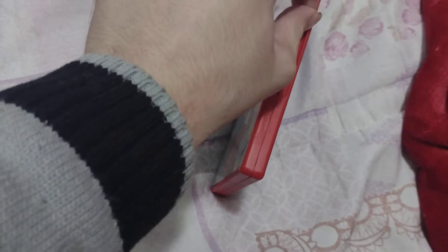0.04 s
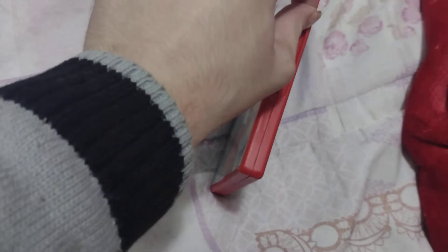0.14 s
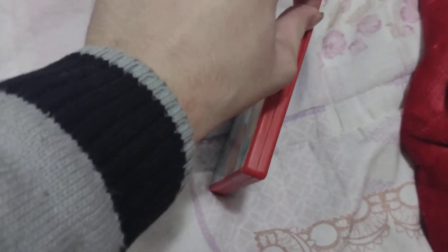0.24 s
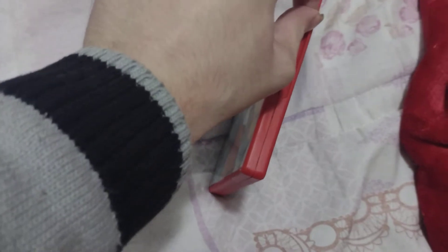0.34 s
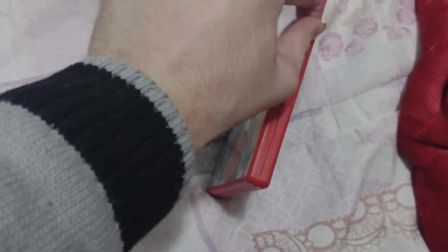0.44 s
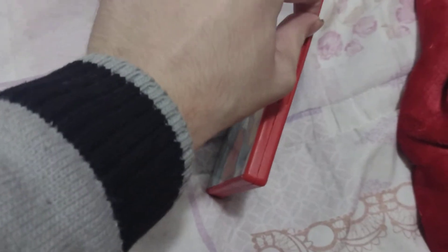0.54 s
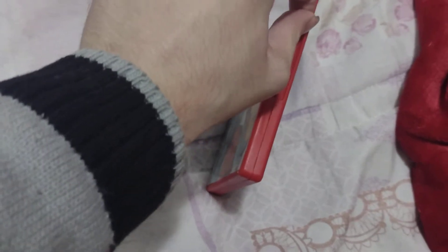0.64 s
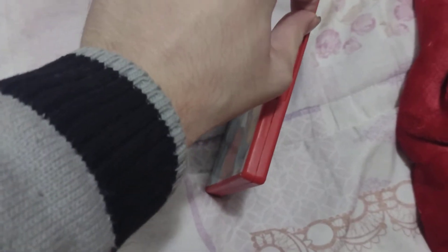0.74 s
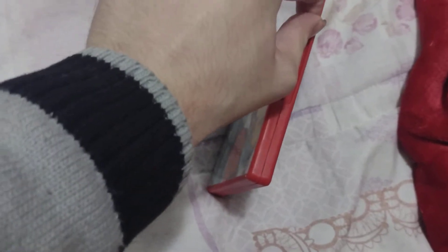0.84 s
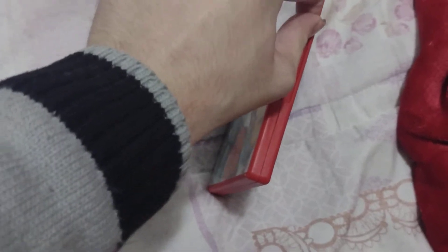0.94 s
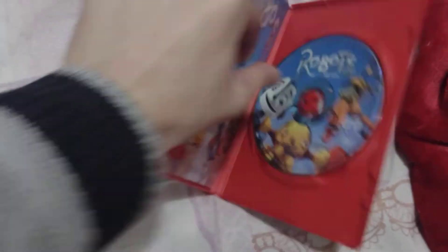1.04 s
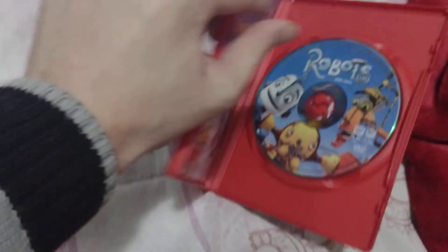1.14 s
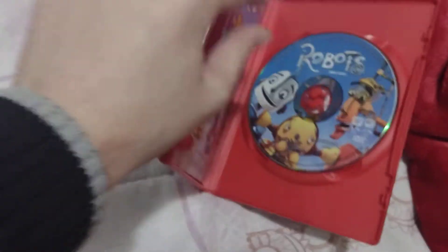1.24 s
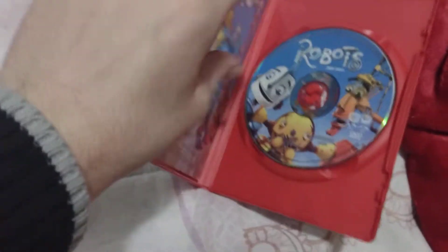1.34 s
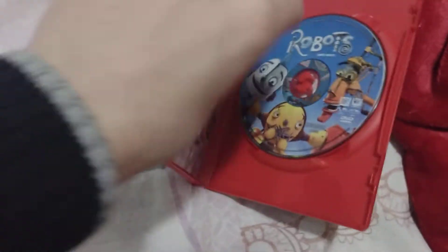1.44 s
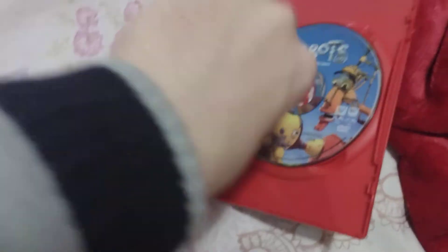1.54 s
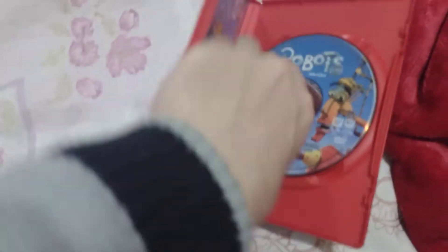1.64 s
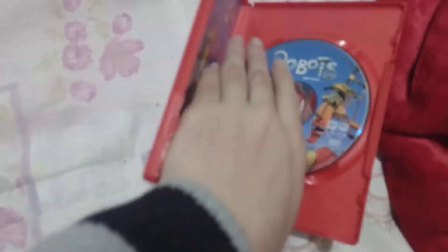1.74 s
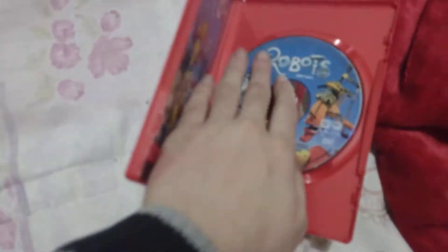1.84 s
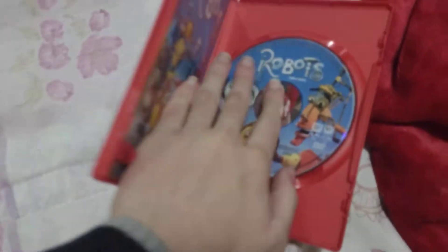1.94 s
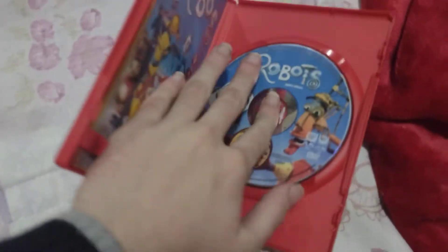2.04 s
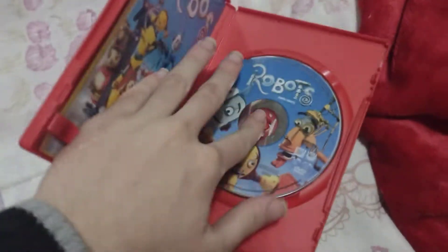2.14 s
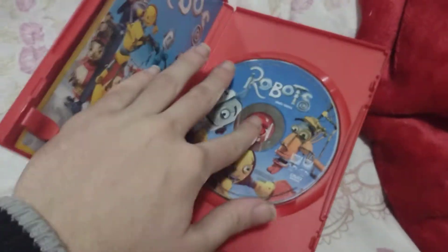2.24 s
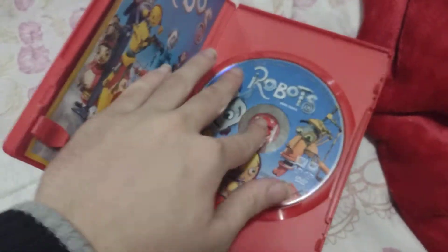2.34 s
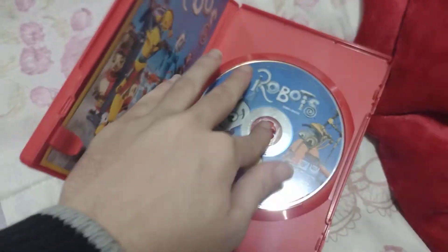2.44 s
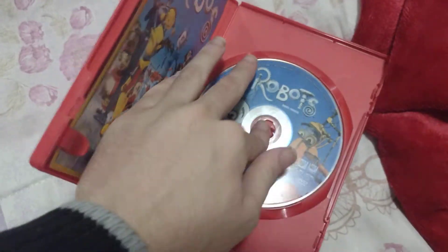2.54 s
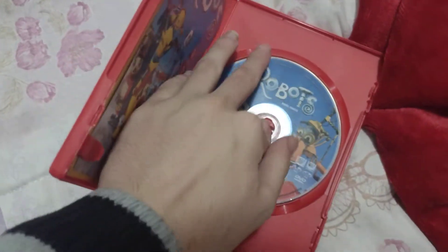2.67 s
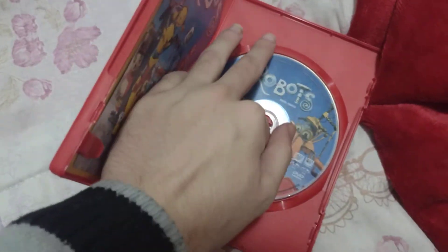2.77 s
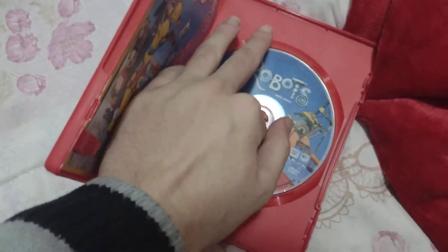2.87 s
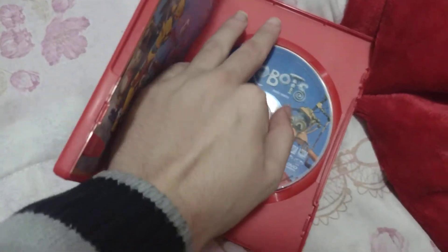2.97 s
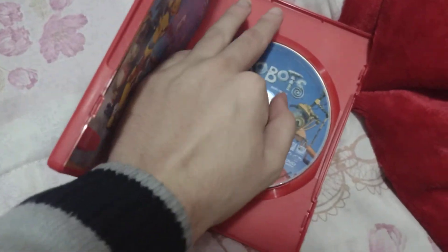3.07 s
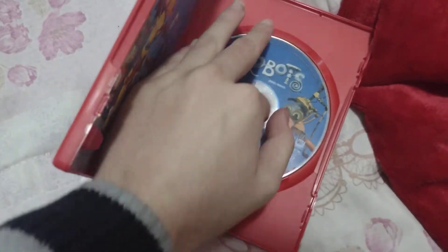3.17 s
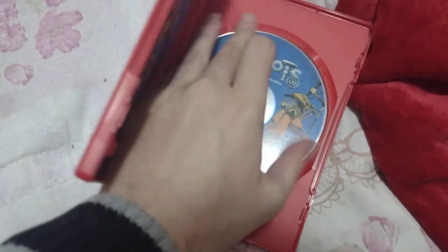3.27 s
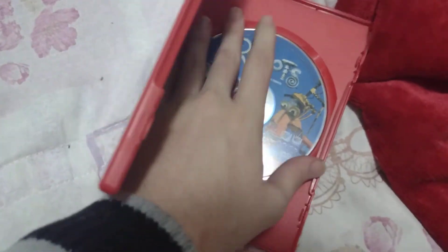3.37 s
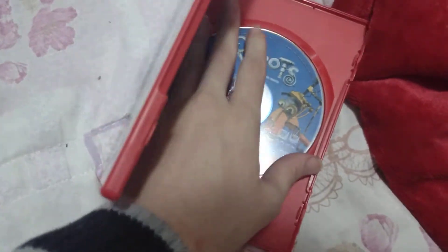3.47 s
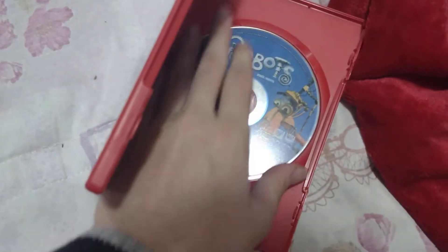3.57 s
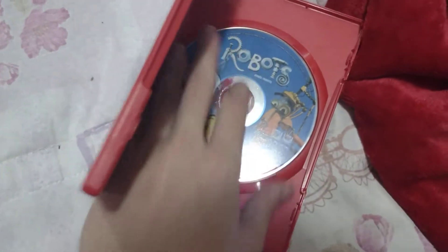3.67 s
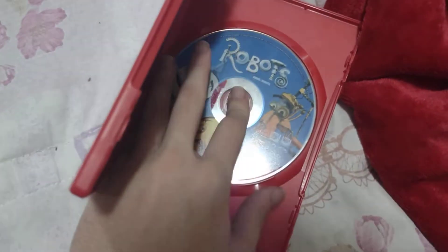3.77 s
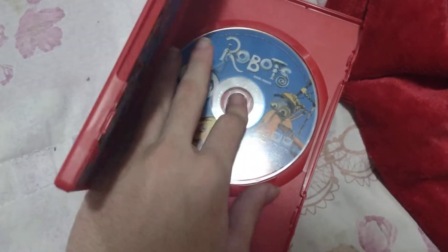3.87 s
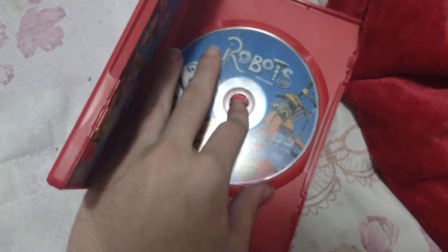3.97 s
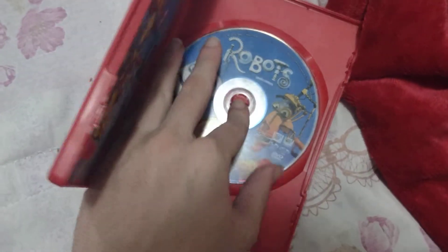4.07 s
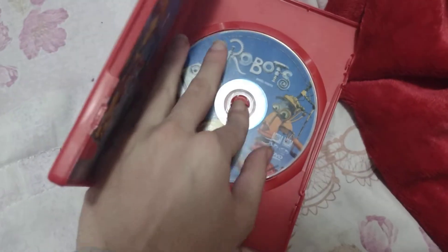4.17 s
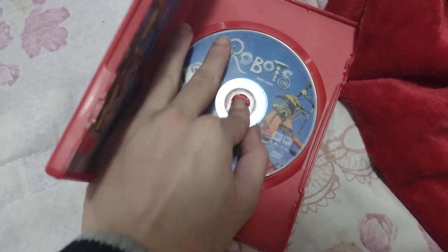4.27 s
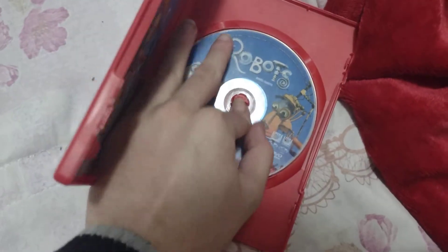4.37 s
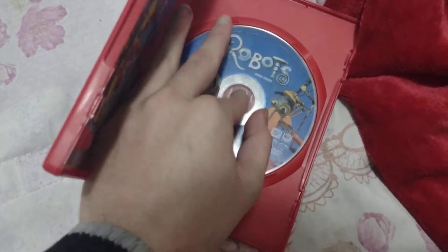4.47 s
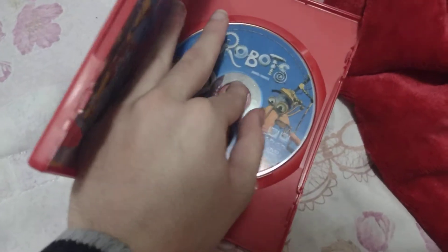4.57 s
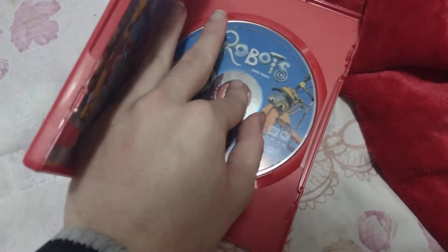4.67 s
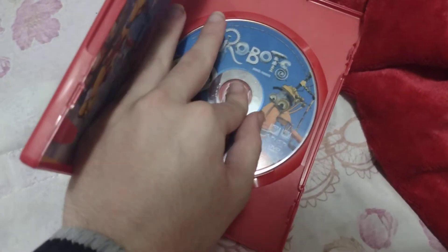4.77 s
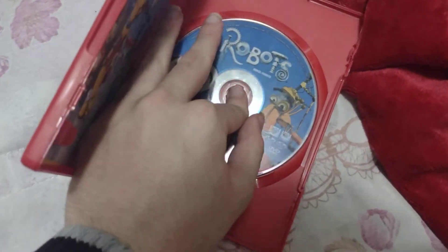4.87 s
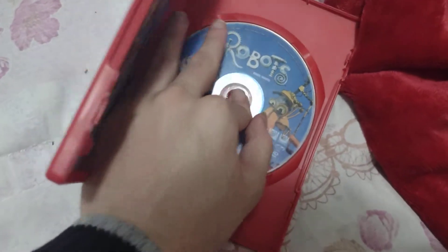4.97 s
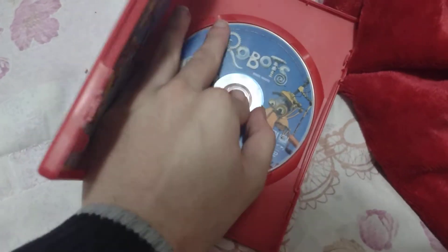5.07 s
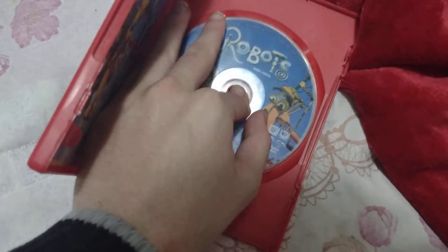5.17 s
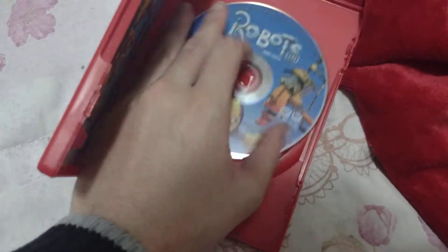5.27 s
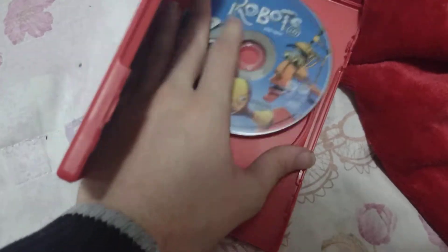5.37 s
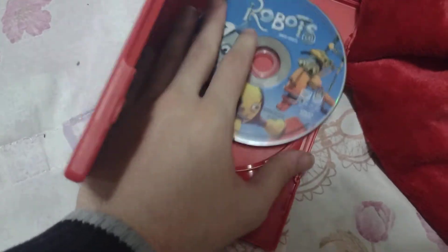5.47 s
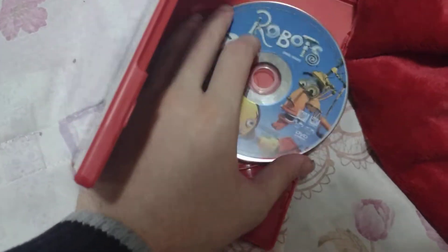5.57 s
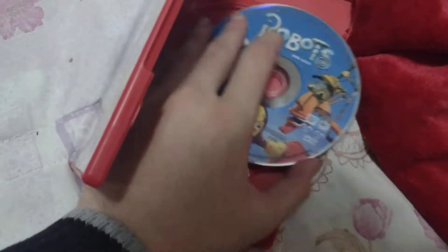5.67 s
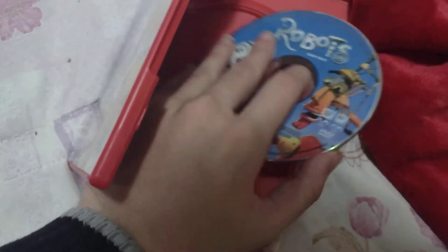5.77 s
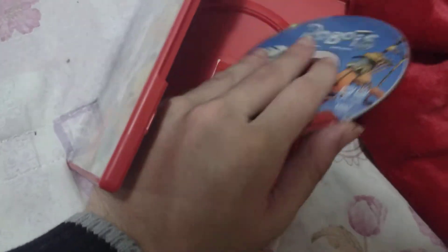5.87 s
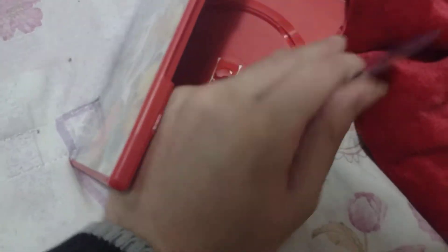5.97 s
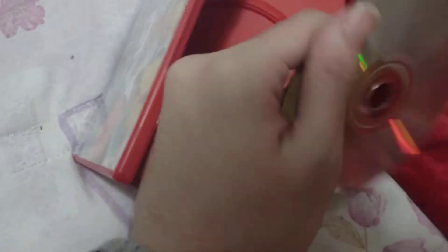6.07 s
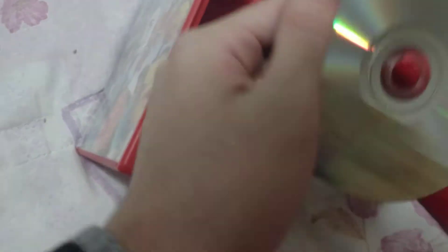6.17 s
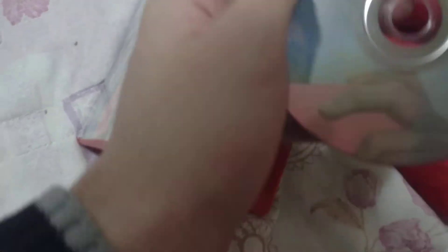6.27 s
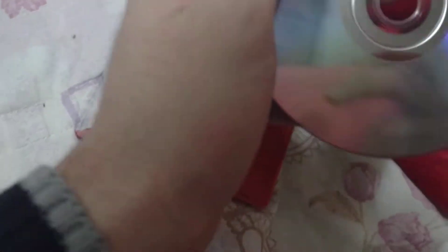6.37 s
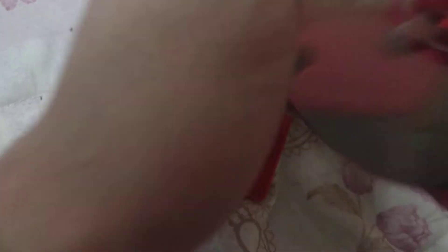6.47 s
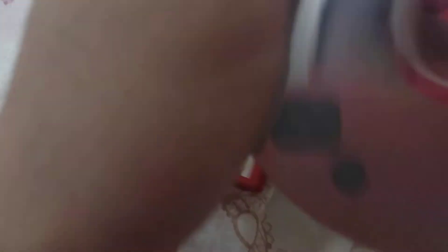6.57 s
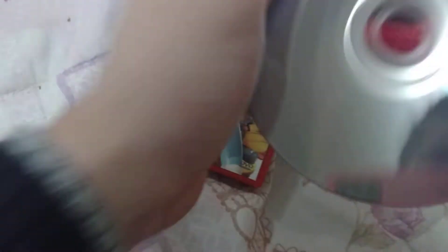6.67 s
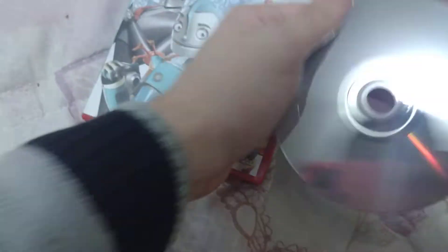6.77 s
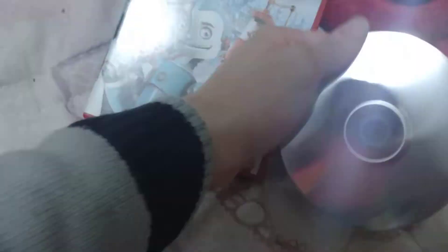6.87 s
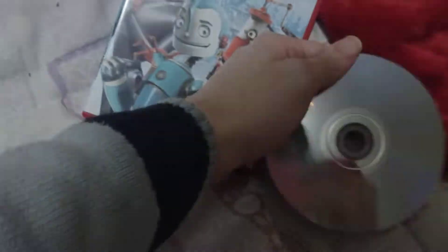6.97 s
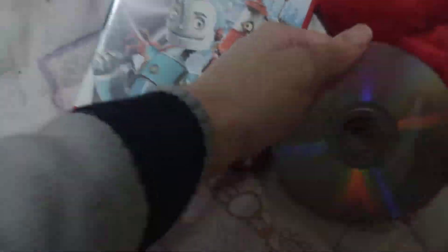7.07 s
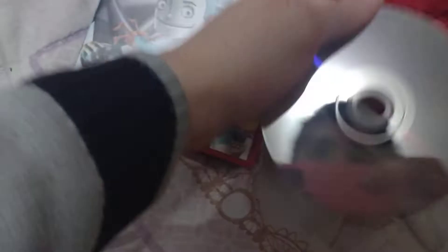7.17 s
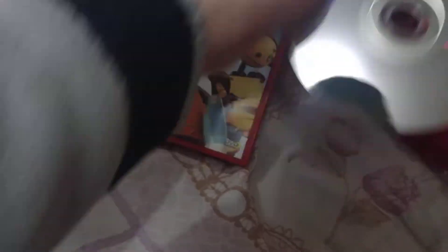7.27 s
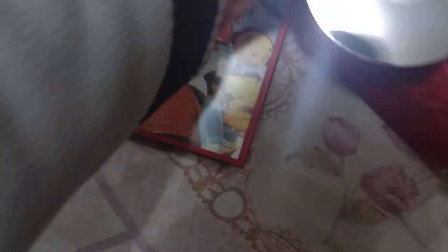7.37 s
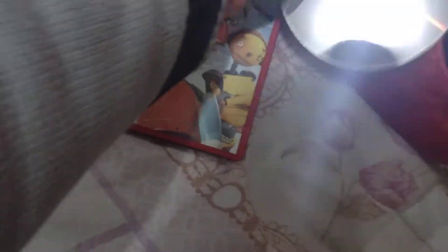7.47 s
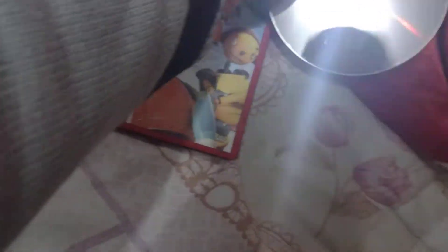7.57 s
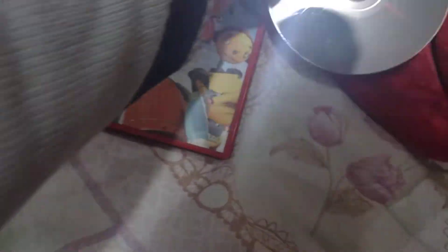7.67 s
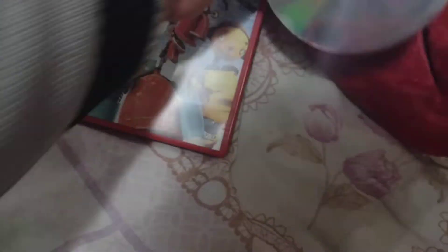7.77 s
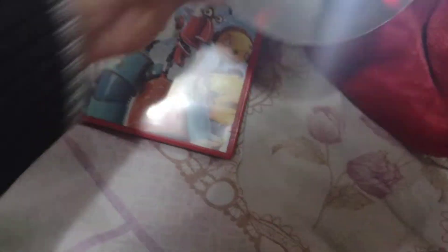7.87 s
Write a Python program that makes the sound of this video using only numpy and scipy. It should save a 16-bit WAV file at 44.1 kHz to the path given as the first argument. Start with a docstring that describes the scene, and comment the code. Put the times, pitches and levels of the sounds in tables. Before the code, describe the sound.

Sharp plastic snaps, hollow knocks and squeaky rubbing as hands open a disc case, prise the disc free and close it.

```python
"""A quick run of sharp snaps, after a second of faint hiss: a plastic disc case is prised open on a bed.
Its bending shell gives hollow knocks, and fingers rub, squeak and press the hub that holds the disc.
The disc pops out and rings as it slides over the rim, then the case is pushed shut with a few knocks.
It all happens close to the microphone, in a small room."""
import sys
import numpy as np
from scipy import signal
from scipy.fft import rfft, irfft
from scipy.io import wavfile
from scipy.ndimage import uniform_filter1d, minimum_filter1d

SR = 44100
rng = np.random.default_rng(int(sys.argv[2]) if len(sys.argv) > 2 else 0)


def dump_mix(stems):
    """Bounce the given channels to the path in sys.argv[1] as a 16-bit WAV at rate SR."""
    frames = np.atleast_2d(stems).T  # one column per channel
    limited = np.clip(frames, -1, 1)  # hard clip at full scale
    pcm = np.round(limited * 32767).astype(np.int16)
    wavfile.write(sys.argv[1], SR, pcm)


N = 349272
HIT = 2048  # samples in one short hit

# the notes at which the case rings with its disc inside: pitch_hz, width_hz, level_db
CASE_NOTES = [(2716, 68, -0.5), (3068, 31, -5), (3430, 140, -0.5), (3910.4, 140, -0.5), (5737, 120, 0),
              (6550, 210, -1), (8290, 380, -6)]
# tone shapes of a low thump, the hollow shell, a bright crack and a rubbing hiss: pitch_hz, level_db
THUMP_TONE = [(30, -26.5), (90, -16.5), (150, -3), (230, 4.5), (420, 7.5), (560, -5.5), (850, -30.5)]
SHELL_TONE = [(200, -30), (480, -16.5), (720, 0.5), (1050, 0), (1600, -3.5), (2200, -6.5), (3000, -12),
              (6000, -53)]
CRACK_TONE = [(900, -34), (2000, -4), (2900, 2), (4200, -6.5), (6400, -3), (8500, -12), (11000, -21)]
HISS_TONE = [(900, -39), (2000, 1), (3000, 3.5), (4200, 1.5), (6000, 2.5), (8500, 1), (11000, 0),
             (16000, -16.5)]
# hand and sleeve slide over the plastic; more grip makes the shell sound more:
# start_s, length_s, level_db, grip_db
SLIDES = [(1.056, 0.4645, -63, -7.5), (1.963, 0.427, -60, -5), (2.563, 0.458, -67.5, -4.5),
          (3.431, 0.519, -56.5, -3.5), (3.589, 0.272, -53.5, -9), (4.192, 0.597, -59, -2.5),
          (4.96, 0.32, -62, -6.5), (5.84, 0.239, -52.5, -11), (5.947, 0.3595, -64, -9),
          (6.603, 0.643, -63.5, -5.5)]


def snap(db, spot_hz, t60, body_db, spot_t60=0.04, spot_db=-3.5, tick_db=-4, ring_db=-6, thump_db=-16):
    """An edge slips off a catch: the struck spot rings with its own note, over the notes of the case."""
    t = np.arange(HIT) / SR
    hz, width, note_db = np.transpose(CASE_NOTES)
    gain = undb(note_db + 2 * rng.standard_normal(len(hz)))
    pitch = hz * (1 + 0.031 * rng.standard_normal(len(hz)))  # the grip bends the shell out of tune
    phase = rng.uniform(0, 2 * np.pi, (len(hz), 1))
    waves = np.sin(2 * np.pi * pitch[:, None] * t + phase) * np.exp(-.35 * width[:, None] * t)
    envelope = fade(t60) - fade(t60 / 10)  # the ring builds as the wave crosses the shell
    ring = at_level(gain @ waves * envelope, ring_db)
    spot = at_level(np.sin(2 * np.pi * spot_hz * t) * envelope * fade(spot_t60), spot_db)
    tick = at_level(colour(impact(t60, rattle=4.2), HISS_TONE), tick_db)
    body = at_level(colour(impact(t60, rattle=1.0), SHELL_TONE), body_db)
    thump = at_level(colour(impact(t60, rattle=1.5), THUMP_TONE), body_db + thump_db)
    return undb(db) * (ring + spot + tick + body + thump)


def snaps_and_ticks(stray_db=7):
    """Creaks, hard snaps, light taps and stray ticks from the sliding hand all ring the same case."""
    # the strained hub and hinge creak: start_s, length_s, level_db, body_db (shell, added to level_db)
    creaks = [(3.268, 0.0287, -42, -3), (4.014, 0.0443, -53, 4.5), (4.275, 0.0455, -37, 4.5),
              (4.578, 0.0407, -35.5, -2.5), (4.647, 0.036, -46, -0.5), (5.382, 0.0551, -32.5, -11)]
    # latch, hub and disc edge snap: start_s, level_db, pitch_hz, body_db (shell, added to level_db)
    hard_snaps = [(1.0705, -33, 3580, -1.5), (1.078, -22.5, 3170, -5), (1.084, -23.5, 2820, -5),
                  (1.099, -24.5, 6036, -10), (1.1155, -15.5, 2952, -10.5), (1.127, -24, 5713, -13),
                  (1.143, -23, 2738, -10), (1.156, -24.5, 5826, -17.5), (1.178, -32, 5967, -12.5),
                  (1.887, -35, 6230, -2.5), (2.764, -36, 7954, -15.5), (3.258, -28.5, 2710, -3.5),
                  (3.2611, -24.5, 2907, -6.5), (3.74, -35.5, 2950, -11.5), (4.5522, -22.5, 6736, -8.5),
                  (4.641, -30.5, 2717, -9), (5.019, -41, 3596, -2), (5.288, -31, 2896, 0),
                  (5.394, -26.5, 4164, -5.5), (5.401, -25.5, 6120, -10.5), (5.4432, -17, 6080, -9),
                  (5.453, -29.5, 2813, -10.5), (5.835, -41, 6105, -10.5)]
    # fingernails and disc edge tap the tray: start_s, level_db
    taps = [(1.315, -48), (1.369, -41), (1.416, -47.5), (2.029, -48), (2.115, -56), (2.179, -46.5),
            (2.284, -56), (2.36, -54.5), (2.415, -51), (2.439, -55), (2.567, -50), (3.037, -49),
            (3.321, -44), (3.335, -45.5), (3.504, -43), (3.625, -57), (4.111, -50.5), (4.152, -49.5),
            (4.196, -55), (4.37, -44.5), (4.624, -44.5), (4.725, -50.5), (4.757, -52.5), (4.785, -56.5),
            (4.985, -54), (5.306, -39.5), (5.463, -41), (5.656, -54.5), (6.086, -44)]
    out = sum(crackle(*creak, per_s=220) for creak in creaks)
    for start, db, spot_hz, body_db in hard_snaps:
        t60 = 0.028 * 2 ** ((-27 - db) / 13.5)  # a strong snap breaks free at once, a weak one rasps on
        add(out, start, snap(db, spot_hz, t60, body_db))
    for start, db in taps:
        add(out, start, snap(db, spot_hz=2778, t60=0.035, body_db=-2.5))
    for start, length, db, grip_db in SLIDES:
        out += crackle(start, length, db + stray_db, grip_db, per_s=30)
    return out


def crackle(start, length, db, body_db, per_s, spread_db=12, t60=0.011):
    """A run of tiny uneven snaps at random spots, strongest in the middle of the movement."""
    out, count = np.zeros(N), int(per_s * length)
    for k, (delay, spot, weakness) in enumerate(rng.random((count, 3))):
        progress = (k + delay) / count
        spot_hz = CASE_NOTES[int(spot ** 2 * len(CASE_NOTES))][0]
        tick = snap(db - spread_db * weakness, spot_hz, t60, body_db)
        add(out, start + progress * length, np.sin(np.pi * progress) * tick)
    return out


def shell_knocks(overtone=1.4, overtone_db=-6, crack_lead_s=0.00039, shut_s=6.5):
    """The shell buckles: a short crack, a hollow note with a higher one above it, and a low thump."""
    # pops of the shell: start_s, level_db, pitch_hz, fade_s, hardness_db (treble, added to level_db)
    pops = [(1.088, -23, 1150, 0.014, -5), (2.8105, -20.5, 1070, 0.0222, -16.5),
            (3.0717, -24, 798.3, 0.0148, -1.5), (4.2414, -34, 817, 0.0576, -36.5),
            (4.44, -20.5, 1226, 0.0178, -13), (4.5517, -24.5, 1430, 0.029, -8),
            (5.1063, -21, 1105, 0.0126, -7), (5.1526, -26, 870, 0.0129, -2), (5.951, -47, 680, 0.0476, -19),
            (6.7488, -34, 1088, 0.0213, -7), (6.9346, -33.5, 1086, 0.035, -5.5),
            (6.9913, -26.5, 821, 0.0135, -16.5), (7.0253, -19.5, 630, 0.0091, -25.5),
            (7.191, -44.5, 880.2, 0.0137, -2), (7.5512, -25, 954, 0.0159, -20),
            (7.794, -47.5, 862, 0.019, -11)]
    # tone shape of the highest treble: pitch_hz, level_db
    treble_tone = [(5000, -20), (8500, 3), (11000, 1), (13500, 6), (16000, -15.5)]
    out = np.zeros(N)
    for start, db, hz, t60, hardness_db in pops:
        thump_db = -12.5 if start >= shut_s else -21  # once shut, the case thumps the bed as one box
        crack_db = -1 + 0.15 * hardness_db  # a harder knock cracks more
        push = colour(impact(t60, rattle=0.66), SHELL_TONE)
        hollow = resonate(push, hz, 0.41 * hz) + undb(overtone_db) * resonate(push, overtone * hz, hz / 2)
        thump = colour(impact(2 * t60, rattle=1.0), THUMP_TONE)
        crack = colour(impact(0.98 * t60, rattle=20.0), CRACK_TONE)
        treble = colour(impact(.7 * t60, rattle=6.9), treble_tone)
        bright = at_level(crack, db + crack_db) + at_level(treble, db + hardness_db)
        add(out, start, at_level(hollow, db) + at_level(thump, db + thump_db))
        add(out, start - crack_lead_s, bright)
    return out


def hand(fidget_start_s=1.1):
    """Long slides mostly hiss, short scuffs scratch and squeak, and in between the hand fidgets."""
    # a finger or edge presses harder and harder, then lets go: peak_s, level_db, build_s, grip_db
    presses = [(1.098, -30, 0.0385, -2.5), (1.768, -49.5, 0.1295, -6.5), (1.834, -44.5, 0.014, -7.5),
               (2.577, -53.5, 0.0468, 5), (3.273, -36, 0.051, -14), (4.009, -47, 0.0189, 0.5),
               (5.406, -45.5, 0.14, -7.5), (6.05, -34, 0.0236, -13), (7.575, -44.5, 0.031, 5)]
    slides = [(undb(db) * arch(start, length) ** 1.3, grip_db) for start, length, db, grip_db in SLIDES]
    fidget = undb(-72.5 + 4 * wander(22)) * (np.arange(N) / SR > fidget_start_s)
    scuffs = [(undb(db) * swell(peak, build), grip_db) for peak, db, build, grip_db in presses]
    return (rubbing(slides + [(fidget, -3)], hiss_db=2.5, scratch_db=-10.5, squeak_db=-13.5)
            + rubbing(scuffs, hiss_db=0, scratch_db=-8.0, squeak_db=-4.5))


def rubbing(moves, hiss_db, scratch_db, squeak_db, thump_db=-11, creak_db=-5):
    """A light hand glides with a hiss; a firm one sticks and slips, so the shell creaks and booms."""
    # two rasping bands of skin gliding on the lid: pitch_hz, width_hz, level_db
    rasp_bands = [(3900, 860, -2), (8615, 640, 2)]
    glide = friction(per_s=5000, grain_db=2.5) * undb(2 * wander(60))
    slips = friction(per_s=600, grain_db=3.8) * undb(3 * wander(40))
    rings = [undb(db) * resonate(slips, hz, width) for hz, width, db in CASE_NOTES[:5]]
    skin = glide + sum(undb(db) * resonate(glide, hz, width) for hz, width, db in rasp_bands)
    surface = undb(hiss_db) * unit(colour(skin, HISS_TONE))
    surface += undb(scratch_db) * unit(colour(slips, CRACK_TONE))
    surface += undb(squeak_db) * unit(sum(rings[:3]))  # the narrow notes squeak
    body = unit(colour(glide + slips, SHELL_TONE))
    body += undb(thump_db) * unit(colour(glide, THUMP_TONE))
    body += undb(creak_db) * unit(sum(rings))
    surface_force = sum(force for force, _ in moves)
    body_force = sum(force * undb(grip_db) for force, grip_db in moves)
    return surface * surface_force + body * body_force


def squeaks():
    """Skin or the disc's edge sticks and slips on the plastic so fast that it briefly holds a note."""
    # squeaky strokes: start_s, length_s, level_db, pitch_hz, width_hz
    strokes = [(1.714, 0.094, -48, 1070, 500), (3.744, 0.06, -48.5, 2810, 400),
               (3.996, 0.0284, -35, 2752, 380.5), (4.421, 0.0167, -43, 1130, 700),
               (5.363, 0.0165, -41.5, 5860, 1400), (5.603, 0.0337, -51, 2906, 202),
               (5.974, 0.0795, -42.5, 9250, 3500), (6.011, 0.0279, -40, 5593, 160),
               (6.047, 0.0298, -31, 6210, 2660)]
    out = np.zeros(N)
    slips = friction(per_s=6000, grain_db=3) * undb(3 * wander(140))
    for start, length, db, hz, width in strokes:
        out += undb(db) * arch(start, length) * unit(resonate_twice(slips, hz, width))
    return out


def disc(start_s=5.752, length_s=0.2155, level_db=-52, edge_db=1):
    """Off the hub, the disc rings with rough, gliding notes while its edge rasps over the tray."""
    # notes of the disc, bent by the lifting fingers: pitch_hz, glide_hz_per_s, level_db
    disc_notes = [(423, 0, -15), (720, -240, 3), (976, 401, 2.5), (1475, -5.5, -5.5)]
    elapsed = np.arange(N) / SR - start_s
    ring = 0
    for hz, glide, db in disc_notes:
        pitch = hz + glide * elapsed + 36 * wander(350)
        ring += undb(db + 3 * wander(110)) * np.sin(2 * np.pi * np.cumsum(pitch) / SR)
    edge = resonate_twice(friction(per_s=900, grain_db=3), hz=3150, width=1000)
    return (unit(ring) + undb(edge_db) * unit(edge)) * undb(level_db) * np.sqrt(arch(start_s, length_s))


def bed_bumps():
    """The whole case is pressed into the mattress with a soft, low bump."""
    # downward pushes: start_s, level_db
    pushes = [(1.086, -40.5), (4.244, -48.5), (4.291, -43.5), (4.642, -50.5), (5.289, -45)]
    out = np.zeros(N)
    for start, db in pushes:
        bump = resonate_twice(impact(t60=0.14, rattle=1.8), hz=220, width=130)
        add(out, start, at_level(bump, db))
    return out


def hand_echoes(x, t60=0.0049, changes_per_s=4):
    """Sound bounces around the hand by short paths, which blend into one another as it moves."""
    paths = rng.standard_normal((2, HIT)) * fade(t60)
    first, second = (signal.oaconvolve(x, p / np.sqrt(np.sum(p ** 2)))[:N] for p in paths)
    turn = wander(changes_per_s)
    return np.cos(turn) * first + np.sin(turn) * second


def room(x, build_s=0.0088):
    """A furnished room adds a blur of echoes that builds quickly and dies sooner in the treble."""
    t = np.arange(SR // 2) / SR
    tail = 0
    # pitch_hz, width_hz, level_db, fade_s
    for hz, width, db, t60 in [(342, 490, -12, 0.39), (1050, 2600, -14, 0.22), (5000, 14000, -18, 0.17)]:
        echoes = rng.standard_normal(len(t)) * np.exp(-np.log(1000) * t / t60)
        echoes *= 1 - np.exp(-t / build_s)
        tail += undb(db) * resonate_twice(echoes / np.sqrt(np.sum(echoes ** 2)), hz, width)
    return signal.oaconvolve(x, tail)[:N]


def air(level_db=-66.0, dip_db=-16, dip_s=0.0398):
    """Faint hiss of room air and microphone, which flutters and dips briefly four times."""
    # tone shape of the hiss: pitch_hz, level_db
    air_tone = [(30, -21.5), (110, -6.5), (450, -4), (1500, -10.5), (3600, -16), (8500, -15),
                (16000, -19.5)]
    t = np.arange(N) / SR
    dips = sum(1. * (abs(t - middle_s) < dip_s / 2) for middle_s in (0.063, 0.55, 5.704, 7.324))
    dips = uniform_filter1d(dips, SR // 100)
    flutter_db = 2.2 * wander(70)
    return unit(colour(rng.standard_normal(N), air_tone)) * undb(level_db + dip_db * dips + flutter_db)


def impact(t60, rattle):
    """The force of a hit: one sharp push of size 1, then a rattle that builds and dies."""
    force = rng.standard_normal(HIT) * (fade(t60) - fade(t60 / 10))
    force *= rattle / np.sqrt(np.sum(force ** 2))
    force[0] += 1
    return force


def friction(per_s, grain_db):
    """Tiny slips at random moments; more grain_db makes their sizes more uneven."""
    count = int(per_s * N / SR)
    place, size, sign = rng.random((N // 4, 3))[:count].T
    force = np.sign(sign - .5) * undb(grain_db * np.minimum(-np.log(1 - size), 4))
    return unit(np.bincount((place * N).astype(int), force, N))


def arch(start, length):
    """The speed of one hand movement, from rest to rest."""
    speed = np.zeros(N)
    stroke = np.sin(np.linspace(0, np.pi, int(length * SR), endpoint=False))
    first = int(start * SR)
    speed[first:first + len(stroke)] = stroke[:N - first]
    return speed


def swell(peak, build, release_s=0.055):
    """Pressure builds from rest to a peak, then falls 20 dB every release_s."""
    force, first = np.zeros(N), int((peak - build) * SR)
    t = np.arange(first, min(first + SR // 2, N)) / SR - peak
    rise = np.clip(1 + t / build, 0, 1) ** 2
    force[first:first + len(t)] = rise * undb(-20 * np.maximum(t, 0) / release_s)
    return force


def fade(t60):
    """A curve, one hit long, that dies away by 60 dB in t60 seconds."""
    return np.exp(-np.log(1000) * np.arange(HIT) / SR / max(t60, 1e-3))


def wander(per_s):
    """A random curve around zero that heads for a new value per_s times a second."""
    values = rng.standard_normal(int(N / SR * per_s) + 2)
    return np.interp(np.arange(N) / SR * per_s, np.arange(len(values)), values)


def resonate(x, hz, width):
    """Keep a band around one pitch; the narrower it is, the longer it rings."""
    return signal.lfilter(*signal.iirpeak(min(hz, SR / 2 - 10), max(hz / width, .5), fs=SR), x)


def resonate_twice(x, hz, width):
    """The same band with steeper sides."""
    return resonate(resonate(x, hz, width), hz, width)


def colour(x, tone):
    """Filter a sound to give it a tone shape."""
    cepstrum = irfft(np.log(undb(over_hz(tone, HIT))))
    cepstrum[1:HIT // 2] *= 2  # folded forward, so nothing sounds before the hit
    cepstrum[HIT // 2 + 1:] = 0
    return signal.oaconvolve(x, irfft(np.exp(rfft(cepstrum))))[:len(x)]


def over_hz(points, size):
    """Spread (pitch_hz, value) points over all the frequencies of a sound of size samples."""
    hz, value = np.transpose(points)
    return np.interp(np.log(np.arange(size // 2 + 1) * SR / size + 1), np.log(hz), value)


def undb(db):
    """Turn decibels into a gain."""
    return 10 ** (np.asarray(db) / 20)


def unit(x):
    """Scale to an average (rms) level of 1."""
    return x / np.sqrt(np.mean(x ** 2) + 1e-30)


def at_level(x, db):
    """Scale a hit to a level in dB, as if its energy were spread over 10 ms."""
    return x * undb(db) * np.sqrt(SR / 100 / np.sum(x ** 2))


def add(track, start_s, sound):
    """Mix one hit into a track."""
    first = int(start_s * SR)
    track[first:first + HIT] += sound[:N - first]


def scene(spread_db=-13, scatter_db=-13):
    """All sounds reach two nearby microphone openings; echoes and hiss differ between them."""
    # how loud the left is against the right: pitch_hz, level_db
    left_level = [(600, -3.5), (1100, -0.98), (2000, -2.5)]
    # how far the left runs ahead of the right: pitch_hz, phase_radians
    left_lead = [(500, 0.0091), (1550, 0.42), (5000, 0.36), (12000, 1)]
    direct = shell_knocks() + snaps_and_ticks() + bed_bumps() + hand() + squeaks() + disc()
    mid = rfft(direct + room(direct) + air())
    side = undb(spread_db) * (room(direct) + air())
    side += undb(scatter_db) * hand_echoes(colour(direct, HISS_TONE))
    tilt = undb(over_hz(left_level, N) / 2) * np.exp(.5j * over_hz(left_lead, N))  # half to each side
    return np.array([irfft(mid * tilt, N) + side, irfft(mid / tilt, N) - side])


def record(dry, gate_db=-58.5, hold_s=0.0005, shut_db=-24, notch_hz=2443, notch_db=-18, top_hz=16500):
    """A fast gate turns faint sound down so it sputters; the microphone's duct cuts notches; peaks clip."""
    peak = -minimum_filter1d(-np.abs(np.mean(dry, axis=0)), int(hold_s * SR))
    opening = 1 / (1 + (undb(gate_db) / (peak + 1e-9)) ** 16)
    sound = dry * (opening + (1 - opening) * undb(shut_db))
    for k in range(1, 7):
        sound -= (1 - undb(notch_db)) * resonate(sound, k * notch_hz, width=560 * k ** 0.65)
    clipped = np.clip(undb(1.7712) * sound, -1, 1)
    return signal.sosfilt(signal.ellip(8, .2, 70, top_hz, fs=SR, output="sos"), clipped)


dry = scene()
out = record(dry)
dump_mix(out)
```